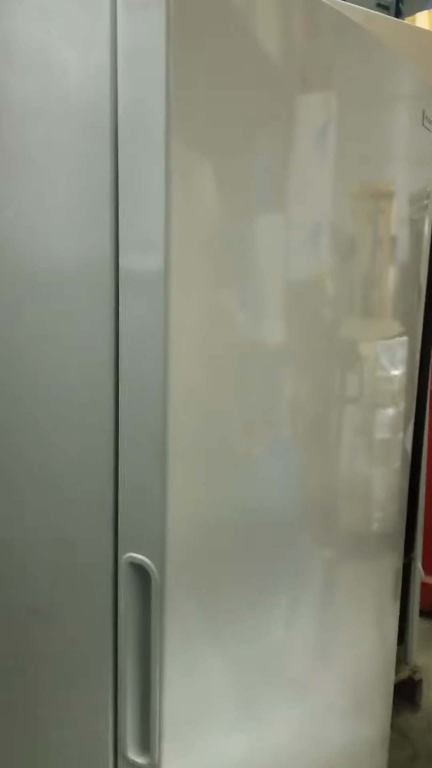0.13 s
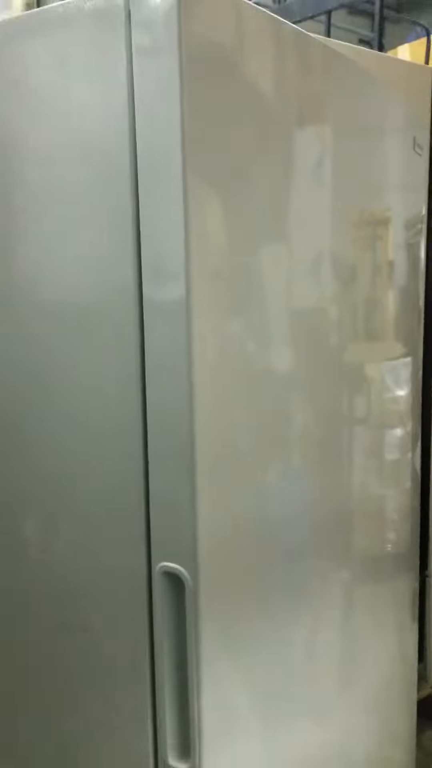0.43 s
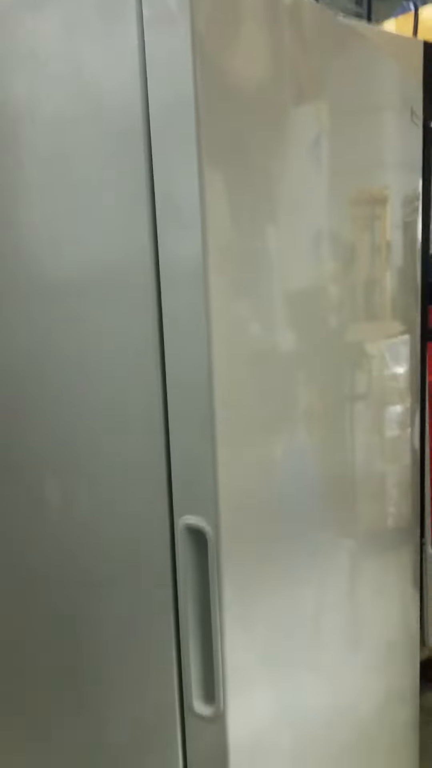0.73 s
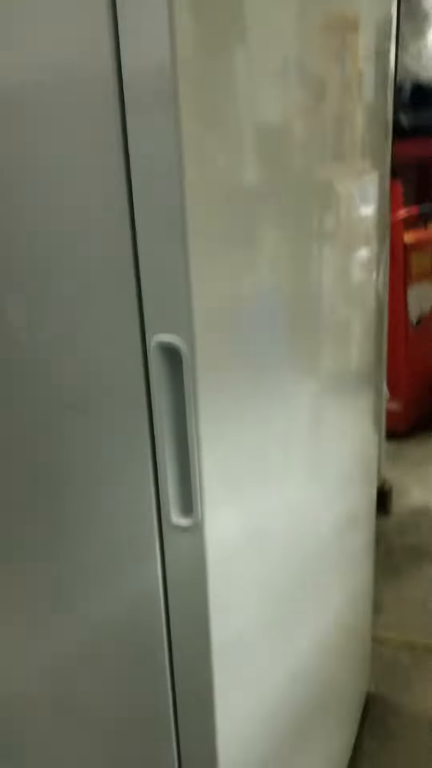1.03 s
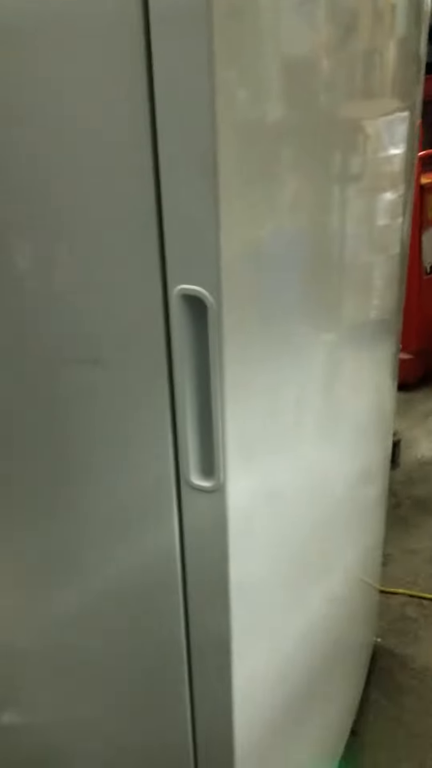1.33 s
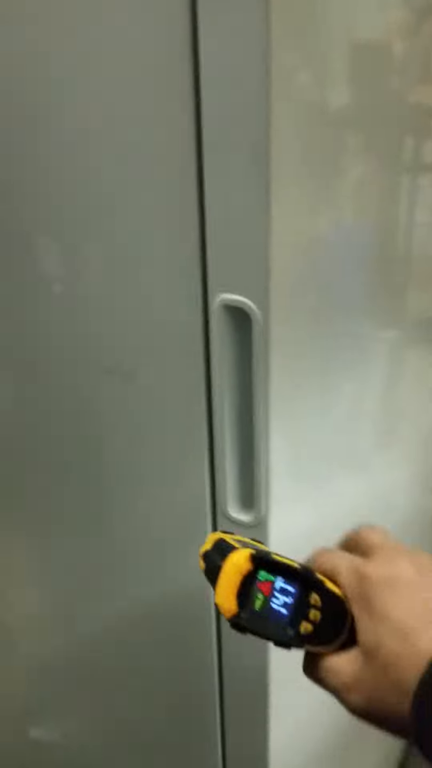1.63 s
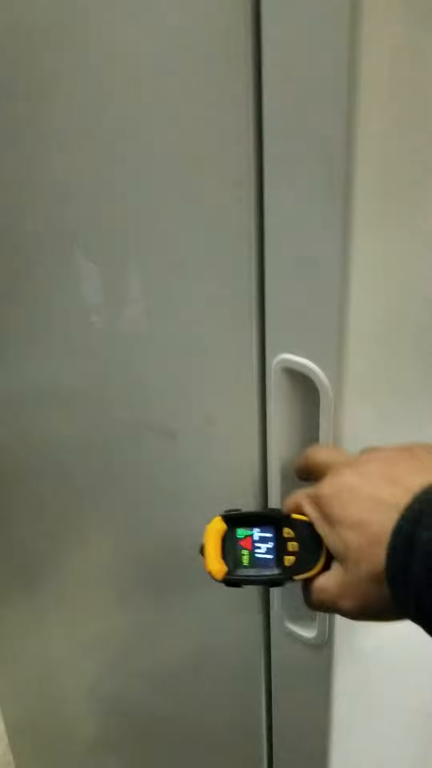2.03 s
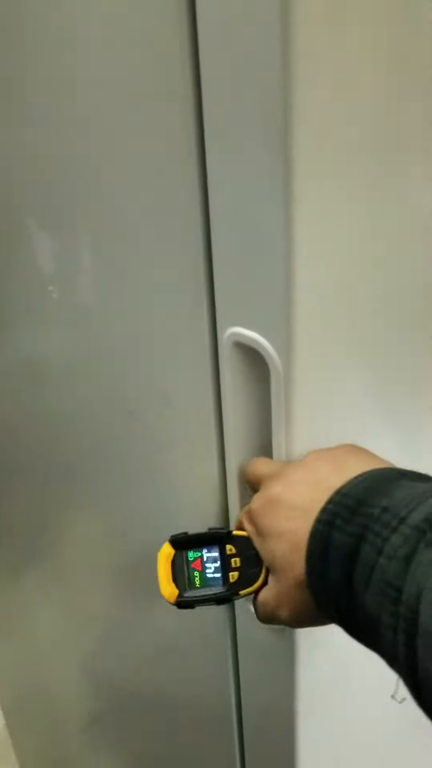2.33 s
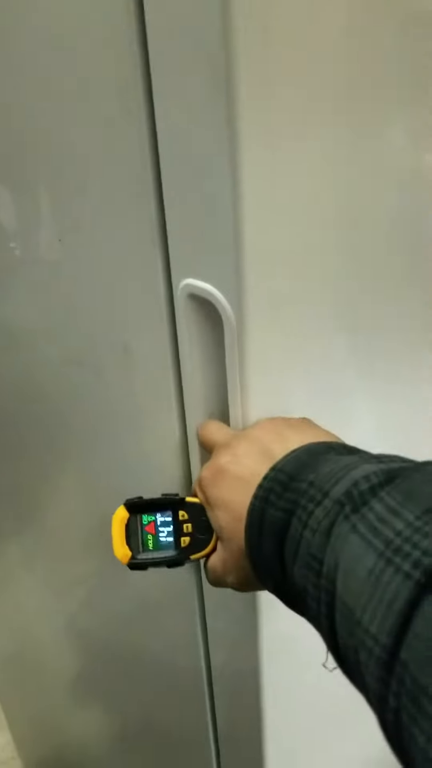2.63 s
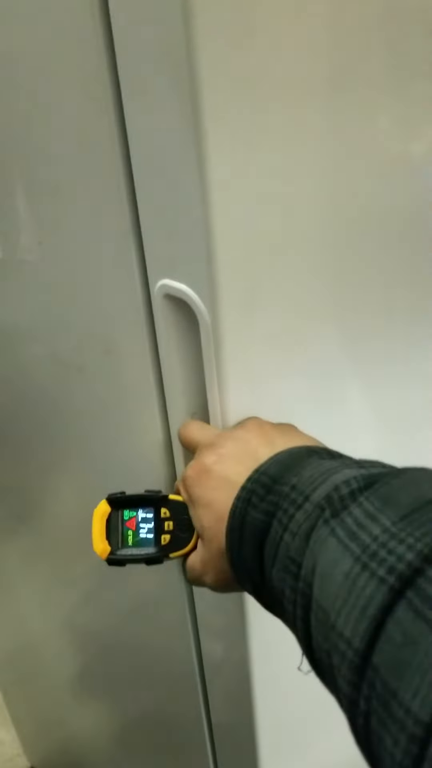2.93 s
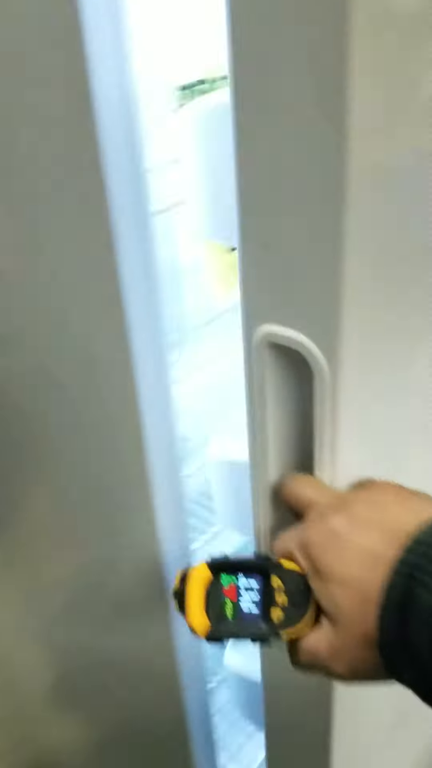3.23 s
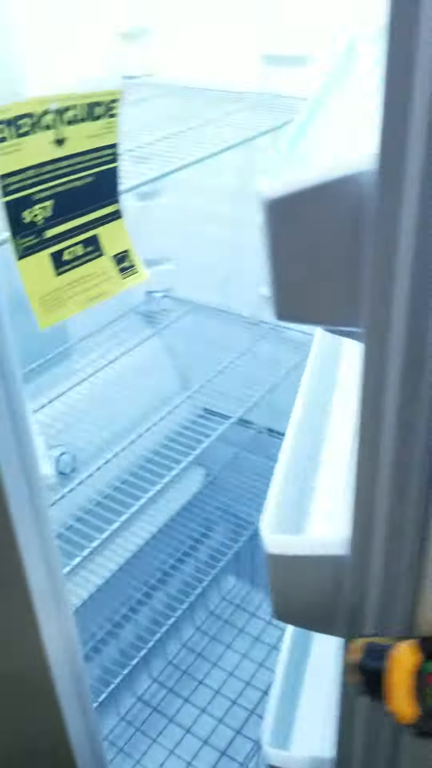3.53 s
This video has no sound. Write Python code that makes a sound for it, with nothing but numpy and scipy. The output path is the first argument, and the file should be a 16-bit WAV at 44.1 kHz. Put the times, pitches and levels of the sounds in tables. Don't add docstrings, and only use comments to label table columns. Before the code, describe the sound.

A freezer door opening, heard on a handheld phone in a rumbling workshop. A low compressor hum runs throughout, with faint cloth rustle and dull low bumps around 1 second. A soft touch comes at 1.5, then ticks and knocks from 2.5 to 2.8. The gasket slips, creaks and tears, with a sharp click and hollow thump at 3.0. Loose shelves clatter from 3.4 to 3.6, with short room reverberation.

```python
import sys
import numpy as np
from scipy import signal
from scipy.fft import rfft, irfft, next_fast_len
from scipy.io import wavfile
from scipy.ndimage import map_coordinates

SR = 44100
rng = np.random.default_rng(int(sys.argv[2]) if len(sys.argv) > 2 else 0)


def natural_amplitude(level_db):
    exponent = np.asarray(level_db, float) / 20
    return 10 ** exponent


def unload_wav(signal):
    wavfile.write(
        sys.argv[1],
        SR,
        np.round(np.clip(np.atleast_2d(signal).T, -1, 1) * 32767).astype(np.int16),
    )


N = 163170
T = np.arange(N) / SR

# [t/s, shaft f/Hz, 3rd order level/dB, 2nd order level/dB]
COMPRESSOR = [(0, 35.72, -46.5, -53.5), (.25, 35.76, -49, -50.5), (.8, 35.92, -48, -53.5),
              (1.05, 35.66, -47, -44.5), (1.27, 35.8, -44, -48), (1.37, 35.84, -45, -62),
              (1.62, 35.67, -46.5, -45.5), (1.8, 35.92, -45, -48), (2.6, 35.8, -43.5, -47),
              (3.05, 35.9, -43.5, -44), (3.15, 35.8, -46, -49.5), (3.4, 35.88, -44, -45.5),
              (3.7, 36.18, -47.5, -43)]
# [multiple, level re motor/dB]
SHAFT_ORDERS = [(1, -8.5), (4, -19), (9, -20.5)]
# [f/Hz, rms level/dB]
FAN_MAINS_TONES = [(153, -63.5), (206.5, -57.5), (240, -53.5), (360, -73.5), (480, -75)]
# [t/s, length/s, share before peak/0-1, level/dB, tearing re slip/dB]
GASKET_SLIPS = [
    (2.815, 0.18, 0, -50, -5),
    (2.845, 0.025, 0.25, -49.5, -20),
    (2.872, 0.13, 0.3, -48.5, -17),
    (2.905, 0.074, 0.44, -37, -8.5),
    (2.965, 0.047, 0.43, -38.5, -17),
    (2.985, 0.058, 0.24, -37.5, -10.5),
    (3.03, 0.05, 0.5, -47.5, -19),
]
# [f/Hz, width/Hz, level/dB]
CABINET_MODES = [(350, 43, 4.5), (775, 75, -5), (1170, 33, -8.5), (1610, 50, -36), (2120, 35, -39),
                 (2400, 140, -17), (2630, 29, -15)]
# [f/Hz, level/dB, t60/s]
SUCTION_MODES = [(55.4, -34.5, 0.27), (97, -35, 0.41), (134, -28.5, 0.18), (172.5, -27, 0.19),
                 (240, -38, 0.13), (348, -34, 0.12)]
# [t/s, peak level/dB, t60/s]
SHELF_STRIKES = [
    (3.258, -42.5, 0.4),
    (3.423, -23, 0.14),
    (3.435, -30, 0.26),
    (3.482, -47, 0.099),
    (3.53, -31.5, 0.069),
    (3.598, -38, 0.12),
    (3.618, -40.5, 0.064),
]
# [f/Hz, width/Hz, level/dB]
SHELF_MODES = [(277, 26, 3), (946, 3.9, 5), (1097, 28, -2.5), (1410, 66, -3.5), (1990, 114, -11),
               (2930, 122, -7), (3200, 79, -12.5), (3680, 61, -8), (6000, 120, -14.5)]
# [t/s, peak level/dB, f/Hz,
# t60/s, rise/s]
PANEL_CREAKS = [(2.68, -42, 875, 0.066, .002), (2.695, -47, 505, 0.09, 0.0034),
                (2.757, -43.5, 893, 0.071, 0.0014), (2.757, -38.5, 240, .15, 0.0037),
                (2.849, -43, 575, 0.14, .003), (2.882, -38, 590, .1, 0.0034),
                (2.912, -37.5, 447, 0.21, 0.0071), (2.932, -37.5, 393, .2, 0.0045),
                (2.935, -34, 738, 0.19, .006), (2.93, -43, 1253, 0.16, 0.0057),
                (2.998, -28.5, 335, 0.12, 0.0025), (3.06, -31.5, 329, 0.065, 0.0028),
                (3.272, -47, 148, 0.69, .01), (3.424, -41, 262.5, 0.39, 0.0032),
                (3.46, -48, 597, 0.14, .005), (3.465, -50, 1290, 0.19, .006), (3.3, -45, 362, 0.44, .01),
                (3.505, -33, 110.6, 0.12, 0.009), (0.931, -37.5, 60, .3, .01),
                (1.18, -37.5, 91.4, .4, 0.018), (1.05, -38.5, 136.6, 0.51, 0.018)]
# [t/s, peak level/dB, t60/s, brightness/dB]
SOFT_KNOCKS = [
    (1.529, -41.5, 0.09, -25),
    (2.068, -50, 0.1, -19),
    (2.677, -34, 0.22, -17.5),
    (2.754, -38, 0.16, -18),
    (3.14, -60, 0.26, 3.5),
    (3.291, -51, 0.49, -1.5),
]
# [f/Hz, width/Hz, level/dB]
DOOR_MODES = [(232, 58, -4), (395, 118, -2), (550, 157, -3), (697.4, 190, -4), (906, 185, -6.5),
              (2000, 281, -19)]
# [t/s, peak level/dB, f/Hz, t60/s]
SHARP_TICKS = [(1.548, -47.5, 5530, 0.032), (2.54, -40.5, 9900, 0.0093), (2.602, -37.5, 5070, 0.0074),
               (2.615, -42, 5000, 0.011), (2.641, -46.5, 6236, .01), (2.677, -37.5, 11300, 0.045),
               (2.817, -33, 3200, 0.012), (2.877, -45, 5500, .01), (2.898, -42.5, 8500, 0.028),
               (2.9944, -23, 8800, 0.028), (3.254, -45.5, 4500, 0.016), (3.296, -43, 5450, 0.0061),
               (3.4239, -22.5, 3000, 0.0035), (3.4347, -29, 3000, .003), (3.5328, -35, 2900, 0.0045),
               (2.668, -51, 4500, 0.0054), (2.743, -45, 4800, .006)]
CLIP_TONES = (2050, 2340)
# [t/s, length/s, share before peak/0-1, level/dB, lower band re upper/dB]
SLEEVE_STROKES = [(.31, 0.25, 0.13, -62, 3.5), (.5, 0.5, 0, -64.5, -4), (.955, 0.25, 0.4, -61, 5),
                  (1.05, .09, .45, -58.5, 1), (1.08, 1, 0.32, -61.5, 4), (1.8, 0.27, 0.43, -66.5, 15),
                  (2.05, 0.8, 0.29, -68, 6.5), (2.38, .2, 0.39, -70, 16.5), (2.66, 0.92, 0.24, -69.5, 11.5),
                  (3.12, 0.16, 0.1, -61.5, 6), (3.2, 0.5, 0.84, -68.5, 7.5)]
# [t/s, peak level/dB]
FIBRE_SNAPS = [(.3258, -52), (.3512, -53), (.385, -56), (.5109, -50), (.5388, -56), (.5677, -55),
               (.5887, -55), (.6211, -56), (.6455, -58), (.6555, -51), (.679, -58), (.7323, -53),
               (.8371, -59), (.877, -58), (.9623, -55), (1.0127, -54), (1.0716, -50), (1.087, -50)]
# [t/s, level/dB]
RUMBLE_LIFT = [(0, 7.5), (.17, -5), (.45, -5), (.78, 15), (.95, -2), (1.3, -4.5), (1.6, 1), (2.0, 4),
               (2.6, 0.5), (3.7, 10)]
# [f/Hz, level/dB]
RUMBLE_COLOUR = [(20, -45), (40, -10), (85, 2), (200, -7), (400, -15), (800, -30), (1500, -40.5),
                 (4000, -47)]
# [f/Hz, likeness/-1 to 1]
PORT_LIKENESS = [(60, 0.88), (180, 1), (550, 0.59), (1650, 0.43), (4970, 0.061), (15000, -0.47)]
# [f/Hz, t60/s]
ROOM_T60 = [(200, 0.19), (2000, 0.29), (10000, 0.26)]
# [f/Hz, level/dB]
LEFT_PORT = [(100, -1), (600, -1.5), (1500, 4), (2600, 9), (3900, 11.5), (5200, -0.5), (7000, -25.5),
             (12000, -18)]
# [f/Hz, level/dB]
RIGHT_PORT = [(100, -1), (600, 4), (3000, 2), (6000, 6.5), (8000, -6.5), (10000, -4), (12500, 4),
              (15500, -12)]
# [f/Hz, level/dB]
LEFT_NOISE = [(1500, -20.5), (2200, -14.5), (3000, -3), (3900, -0.5), (4700, -27.5), (5500, -31),
              (9000, -32.5), (13000, -30)]


def unit(x):
    return x / np.sqrt(np.mean(x ** 2) + 1e-20)


def along(points, hz):
    f, v = np.transpose(points)
    return np.interp(np.log(hz + 1), np.log(f + 1), v)


def curves(rows):
    s, *cols = np.transpose(rows)
    return [np.interp(T, s, c) for c in cols]


def wobble(rate_hz):
    knots = rng.standard_normal(int(N * rate_hz / SR) + 4)
    return map_coordinates(knots, [T * rate_hz])


def filtered(x, response):
    m = next_fast_len(N + SR // 2)
    hz = np.fft.rfftfreq(m, 1 / SR)
    return irfft(rfft(x, m) * response(hz), m)[..., :N]


def coloured(x, points):
    gain = natural_amplitude(along(points, np.fft.rfftfreq(4096, 1 / SR)))
    cep = irfft(np.log(gain))
    cep[1:2048] *= 2
    cep[2049:] = 0
    impulse = irfft(np.exp(rfft(cep)))
    return signal.fftconvolve(x, impulse)[:N]


def body(x, modes, widen, broad_db):
    def gain(f):
        total = natural_amplitude(broad_db)
        for k, (centre_hz, width_hz, db) in enumerate(modes):
            damping = 1j * f * width_hz * widen
            total = total + (-1) ** k * natural_amplitude(db) * damping / (centre_hz ** 2 - f * f + damping)
        return total

    power = np.mean(abs(gain(np.linspace(20, SR / 2, 4000))) ** 2)
    return filtered(x, gain) / np.sqrt(power)


def grit(spread_db, rate_hz):
    return unit(rng.standard_normal(N) * natural_amplitude(spread_db * wobble(rate_hz)))


def dying(s, db, t60, attack_s):
    t60 = max(t60, 1e-3)
    out, t = np.zeros(N), T[:round(2 * t60 * SR)]
    envelope = natural_amplitude(db - 60 * t / t60) * (1 - np.exp(-t / attack_s))
    part = out[round(s * SR):][:len(t)]
    part += envelope[:len(part)]
    return out


def strokes(rows):
    main, second = np.zeros((2, N))
    for s, length_s, share, db, over_db in rows:
        corners_s = s + length_s * np.array([0, np.clip(share, .02, .98), 1])
        shape = np.sin(np.pi / 2 * np.interp(T, corners_s, [0, 1, 0])) ** 1.3
        main = np.hypot(main, natural_amplitude(db) * shape)
        second = np.hypot(second, natural_amplitude(db + over_db) * shape)
    return main, second


def motor():
    motor_db, port_turn_rad, port_db = -46, 0.068, 0.02
    shaft_hz, third_db, second_db = curves(COMPRESSOR)
    turn = 2 * np.pi * np.cumsum(shaft_hz) / SR
    side = np.array([[1], [-1]])

    def tone(db, phase):
        level = natural_amplitude(db + side * port_db * wobble(1.22))
        return level * np.sin(phase + side * port_turn_rad * (1.8 + wobble(1.58)))

    levels = [(2, second_db), (3, third_db)]
    levels += [(k, motor_db + db + 1.4 * wobble(3.1)) for k, db in SHAFT_ORDERS]
    out = np.zeros((2, N))
    for k, db in levels:
        phase = k * turn + rng.uniform(0, 2 * np.pi) + 0.053 * wobble(5)
        out += tone(db + 0.88 * wobble(9.7), phase)
    for hz, db in FAN_MAINS_TONES:
        out += tone(db + 2.14 * wobble(7.94), 2 * np.pi * hz * T + 0.46 * wobble(5.634))
    return np.sqrt(2) * out


def suction():
    start_s = 2.985
    return sum(dying(start_s, db, t60, 0.004) * np.sin(2 * np.pi * hz * (T - start_s))
               for hz, db, t60 in SUCTION_MODES)


def peel():
    pull, tear = strokes(GASKET_SLIPS)
    slips = body(natural_amplitude(-1) * pull * grit(2.5, 150), CABINET_MODES, widen=4.0, broad_db=-38.0)
    tearing = natural_amplitude(2.0) * tear * grit(3.8, 300)
    tearing = coloured(tearing, [(1200, 9.0), (3500, 0.5), (6000, -12.0), (13000, -26)])
    return slips + tearing + suction()


def shelves():
    chatter = sum(dying(s, db - 9.5, t60, 0.0041) for s, db, t60 in SHELF_STRIKES) * grit(2.6, 350)
    blows = np.zeros(N)
    for s, db, _ in SHELF_STRIKES:
        blows[round((s + .001) * SR)] = natural_amplitude(db + 21.5)
    drive = coloured(chatter, [(200, -4), (3000, -2.5), (13000, -18.5)])
    drive += coloured(blows, [(700, -8.5), (3200, -1.0), (6000, -29.5)])
    return body(drive, SHELF_MODES, widen=4.3, broad_db=-15.5)


def creaks():
    shake_db, drift_rad = 2.8 * wobble(90), .5 * wobble(60)
    notes = sum(dying(s, db, t60, rise_s) * np.sin(2 * np.pi * hz * (T - s) + drift_rad)
                for s, db, hz, t60, rise_s in PANEL_CREAKS)
    return natural_amplitude(shake_db) * notes


def knocks():
    thud = sum(dying(s, db, t60, 0.002) for s, db, t60, _ in SOFT_KNOCKS) * grit(3.3, 200)
    for s, db, *_ in SOFT_KNOCKS:
        thud[round((s + .002) * SR)] += natural_amplitude(db + 16.5)
    scuff = sum(dying(s, db + bright_db, 0.65 * t60, 0.0024) for s, db, t60, bright_db in SOFT_KNOCKS)
    scuff = coloured(scuff * grit(7.2, 400), [(1200, 9), (2500, 11.0), (7000, -10.5), (14000, -25)])
    return natural_amplitude(-5.5) * body(thud, DOOR_MODES, widen=0.96, broad_db=-62) + scuff


def shelf_clip():
    ring = sum(np.sin(2 * np.pi * hz * T) for hz in CLIP_TONES)
    return dying(3.296, -43, 0.028, 0.00074) * ring


def ticks():
    edge_db = 6
    out, noise = np.zeros(N), rng.standard_normal(N)
    for s, db, hz, t60 in SHARP_TICKS:
        crack = dying(s, db, t60, .0004) * noise
        crack[round((s + .0005) * SR)] += natural_amplitude(db + edge_db)
        pitched = signal.lfilter(*signal.iirpeak(hz, 1.3, SR), crack)
        out += 0.1 * crack + 1.35 * pitched
    return coloured(out + shelf_clip(), [(800, -50), (2000, 4), (8000, 1.5)])


def sleeve():
    fibre_db, fibre_t60_s = 6, .006
    high, low = strokes(SLEEVE_STROKES)
    snaps = sum(dying(s, db + fibre_db, fibre_t60_s, 0.00022) for s, db in FIBRE_SNAPS)
    high = high * grit(1.5, 60) + snaps * rng.standard_normal(N)
    low = low * grit(1.5, 30)
    high = coloured(high, [(7000, -4.5), (9500, 1), (13000, 6.0)])
    return high + coloured(low, [(2000, -46), (4500, -4.5), (6500, -3), (8500, -34)])


def scatter(x):
    scatter_db, t60_s = -16.5, .05
    t = np.arange(3500) / SR
    paths = natural_amplitude(scatter_db - 60 * t / t60_s) * np.diff(rng.standard_normal((2, 3501)))
    paths[[0, 1], [9, 0]] += 1
    return signal.fftconvolve(x[None], paths, axes=1)[:, :N]


def room(x):
    hz, t, z = signal.stft(rng.standard_normal((2, SR // 2)), SR, nperseg=256)
    decay = natural_amplitude(-60 * t / along(ROOM_T60, hz)[:, None])
    tail = signal.istft(z * decay, SR, nperseg=256)[1]
    tail = tail / np.linalg.norm(tail[0])
    late = np.pad(x, (120, 0))[None]
    return signal.fftconvolve(late, tail, axes=1)[:, :N]


def air():
    air_db, split_hz = -49.5, 458
    spectrum = [(14, -78)] + RUMBLE_COLOUR + [(16000, -74)]

    def mid_side(hz):
        angle = np.arccos(np.clip(along(PORT_LIKENESS, hz), -1, 1)) / 2
        return natural_amplitude(along(spectrum, hz)) * np.array([np.cos(angle), np.sin(angle)])

    mid, side = filtered(rng.standard_normal((2, N)), mid_side)
    both = natural_amplitude(air_db + 0.84 * wobble(4.16)) * unit(np.array([mid + side, mid - side]))
    low = filtered(both, lambda hz: 1 / (1 + (hz / split_hz) ** 4))
    return low + natural_amplitude(curves(RUMBLE_LIFT)[0]) * (both - low)


def scene():
    hum = motor()
    door = peel() + shelves() + creaks() + knocks()
    snaps = np.array([ticks(), ticks()])
    direct = snaps * natural_amplitude([[-9], [0]]) + sleeve() * natural_amplitude([[-15], [0]])
    reverb = natural_amplitude(-5) * room(door + 0.59 * snaps[1])
    return hum + scatter(door) + direct + reverb + air()


def low_pass(x):
    return signal.sosfilt(signal.butter(12, 16490, fs=SR, output="sos"), x)


def record(dry):
    left_hiss_db, right_hiss_db, top_hz = -57, -70.5, 15830
    hiss = rng.standard_normal((2, N))
    left = coloured(dry[0], LEFT_PORT)
    left += natural_amplitude(left_hiss_db) * unit(coloured(hiss[0], LEFT_NOISE))
    right = coloured(dry[1] + natural_amplitude(right_hiss_db) * hiss[1], RIGHT_PORT)
    mix = filtered(np.array([left, right]), lambda hz: hz < top_hz)
    return low_pass(mix)


dry = scene()
out = record(dry)
unload_wav(out)
```